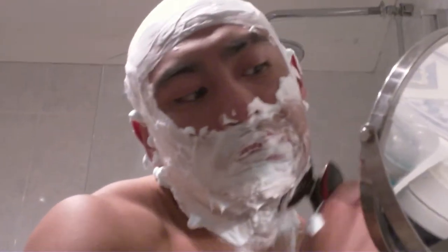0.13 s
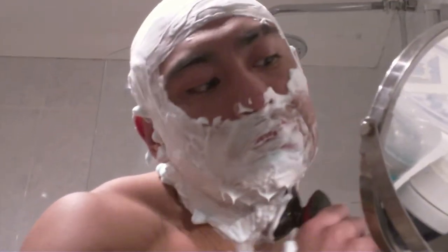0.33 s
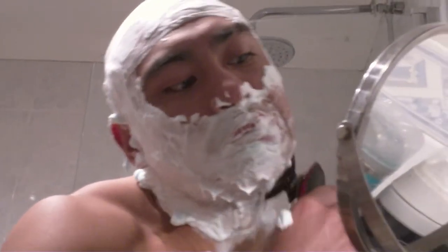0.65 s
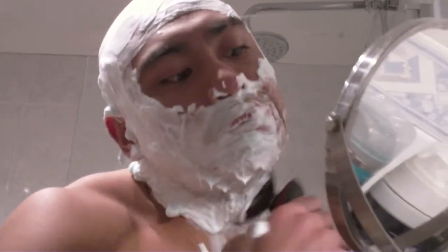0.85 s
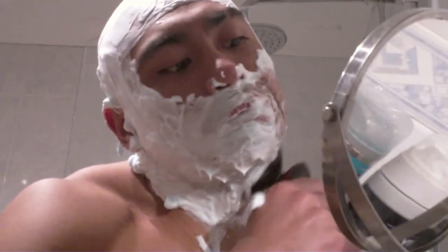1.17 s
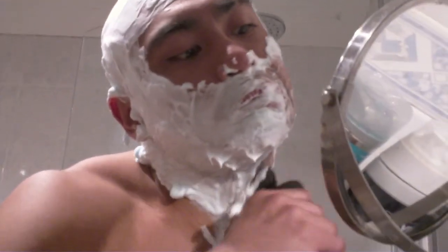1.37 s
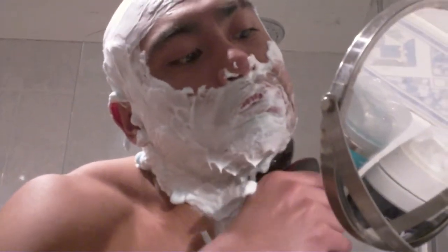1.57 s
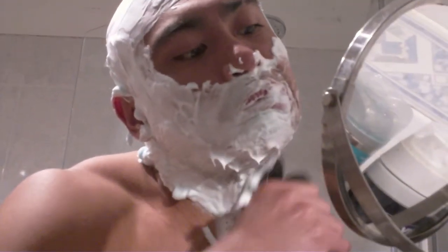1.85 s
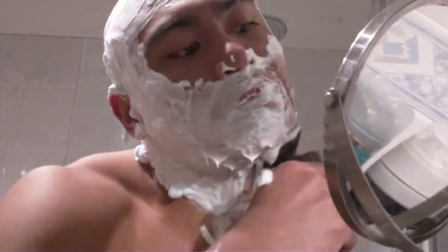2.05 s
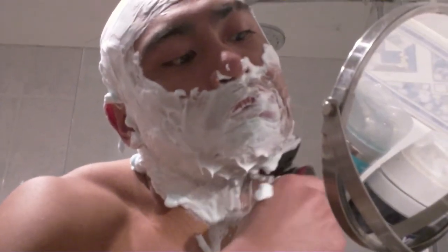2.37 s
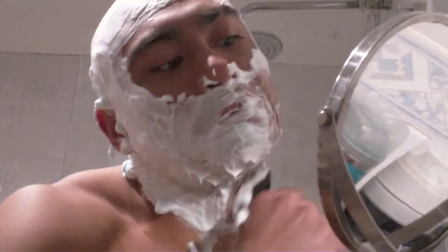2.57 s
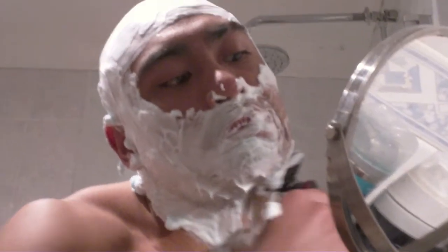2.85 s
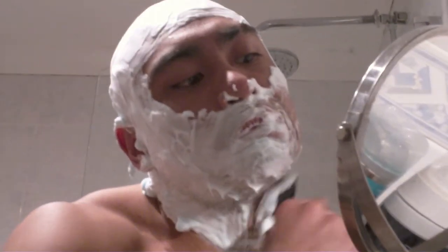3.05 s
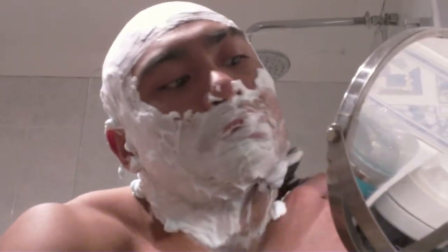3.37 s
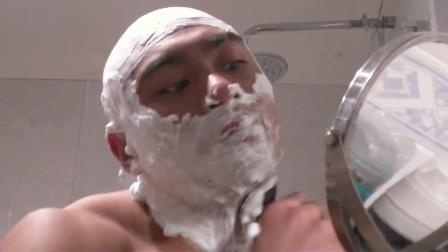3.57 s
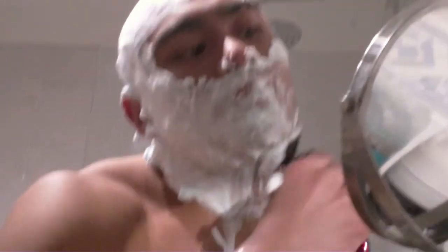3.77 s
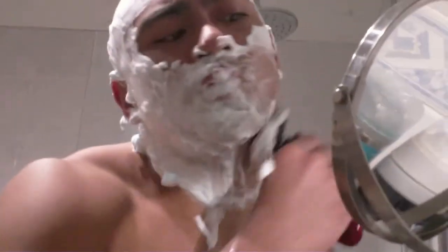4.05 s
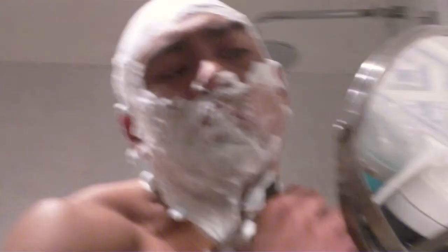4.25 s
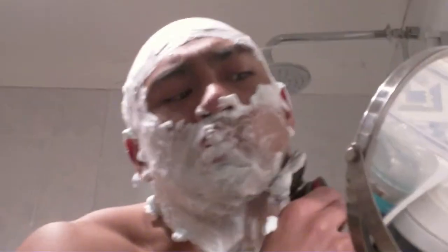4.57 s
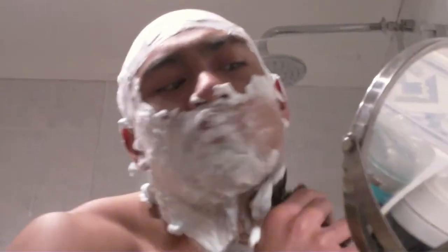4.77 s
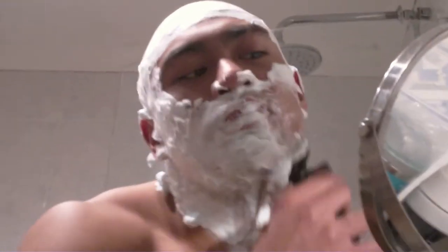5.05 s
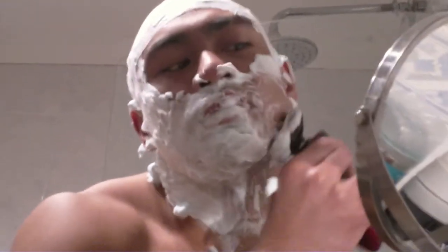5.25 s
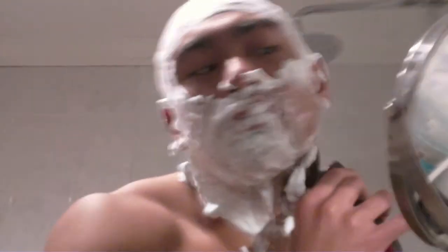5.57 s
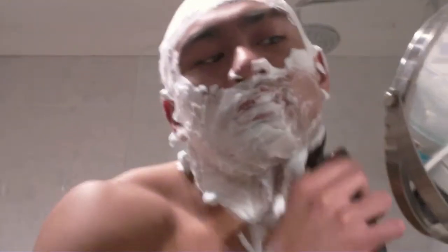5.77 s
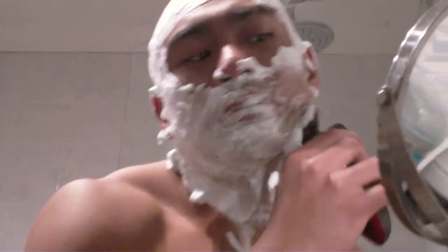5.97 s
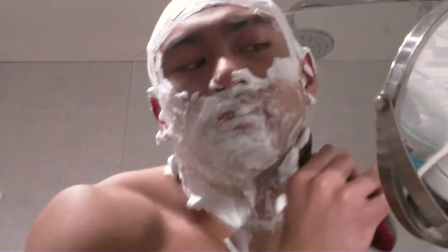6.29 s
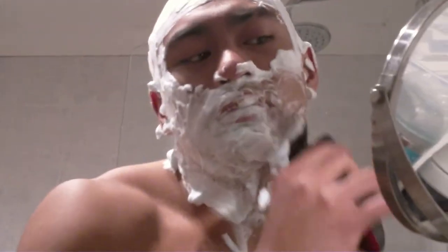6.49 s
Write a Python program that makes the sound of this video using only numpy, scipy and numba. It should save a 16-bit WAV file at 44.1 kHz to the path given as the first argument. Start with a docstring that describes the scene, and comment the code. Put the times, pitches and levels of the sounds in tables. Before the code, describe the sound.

A rotary electric shaver buzzes steadily close up over a foamy face and neck, with crackling foam and rasping stubble in a small bathroom.

```python
"""The buzz of a rotary electric shaver, close up, working over a foamy face and neck.
Motor and gears whine through the shell, the shell shakes once a turn and the cutters chatter in their
guards. Foam crackles, stubble rasps, single hairs snap and the thin steel heads sing out now and then.
The hand bumps softly twice. A small tiled bathroom adds a short echo; a fan rumbles behind it all."""
import sys
import numpy as np
from scipy import signal
from scipy.fft import rfft, irfft
from scipy.io import wavfile
from scipy.ndimage import uniform_filter1d
from numba import njit

SR = 44100
rng = np.random.default_rng(int(sys.argv[2]) if len(sys.argv) > 2 else 0)


def to_wav(s):
    """Save 16-bit WAV."""
    ch = np.atleast_2d(s).T  # columns
    pcm = np.round(np.clip(ch, -1, 1) * 32767)  # PCM
    wavfile.write(sys.argv[1], SR, pcm.astype(np.int16))


N = 292383

# Tone colour of the fan (frequency [Hz], relative level [dB])
FAN_SPECTRUM = [(26, -43), (45, -18.5), (64, -6.5), (108, -9), (145, -2), (219, -2), (255, -6), (324, -1.5),
                (447, -9), (544, -3.5), (631, -22), (700, -4.5), (910, -31), (1540, -120)]
# Fader ride on the fan (time [s], level [dB])
FAN_LEVEL = [(0.0, -37.5), (0.2, -45), (0.8, -47), (2.9, -45), (6.63, -45.5)]
# Knocks of the hand (time [s], level [dB], pitch [Hz])
HAND_BUMPS = [(3.927, -19, 171), (4.837, -23, 295)]
# Hairs snapping (time [s], peak before the low cut [dB], pitch [Hz])
HAIR_SNAPS = [(0.1087, -13.5, 6130), (0.2044, -18, 6460), (0.315, -18, 5800), (0.4504, -14, 5720),
              (2.368, -13, 5600), (2.597, -17, 5500), (3.469, -14, 6070), (3.904, -9.5, 6970),
              (3.9444, -21, 7240), (4.0704, -19, 7600), (4.091, -15, 8000), (4.163, -16, 7250),
              (4.1984, -11, 6030), (4.213, -8, 6070), (4.2275, -9, 8530), (4.2374, -18.5, 6900),
              (4.3211, -18, 7700), (4.6673, -12, 8350), (4.6793, -13, 8240), (4.739, -13, 6100),
              (4.8514, -8, 7000), (4.869, -3, 7300), (4.8888, -12, 7100), (5.1477, -9.5, 6950),
              (5.1692, -12, 7200), (5.5197, -6, 5730), (5.55, -7.5, 6550), (5.5935, -8, 7360),
              (5.6108, -8, 7200), (5.6406, -13, 6900), (6.3953, -11, 6700)]
# Steady bed of foam crackle (time [s], level [dB])
FOAM_LEVEL = [(0, -38), (.12, -33), (.6, -36.5), (.88, -36.5), (1.25, -35), (2.3, -34), (2.75, -32.5),
              (3.28, -36), (3.36, -31), (4.4, -31), (4.6, -33), (5.4, -30), (5.8, -31), (6.15, -42),
              (6.3, -32.5), (6.63, -35.5)]
# The heads run into stubble (start [s], length [s], level [dB], offset for sizzle and fizz [dB])
STUBBLE_RASPS = [(0.095, 0.28, -37.5, -17), (0.727, 0.067, -39, -6), (2.358, 0.11, -38, -6),
                 (2.906, 0.093, -36, -3), (3.326, 0.026, -34, 6), (3.444, 0.073, -27, 10),
                 (3.584, 0.023, -27, 2), (3.884, 0.097, -28, 11), (4.033, .07, -24, 9), (4.16, .08, -30, 8),
                 (4.314, 0.033, -28.5, 14), (4.666, 0.26, -24, 5.5), (5.11, 0.077, -26, -2),
                 (5.482, .2, -22.5, 6), (5.937, 0.026, -29, -4), (6.317, 0.14, -26, 6)]
# The steel heads sing out (start [s], length [s], level [dB])
HEAD_SQUEALS = [(1.2, 0.23, -39), (2.9, .05, -45), (3.33, 0.034, -43), (4.33, .1, -38),
                (4.85, 0.034, -20.5), (5.14, 0.029, -27), (5.31, 0.094, -29), (5.655, 0.021, -16.5),
                (5.94, 0.026, -32.5)]
# Resonances of the steel heads: ring, crackle, airy fizz, fine sizzle (centre [Hz], width [Hz], gain [dB])
HEAD_MODES = [(7150, 340, -1.3), (7470, 150, -1.3)]
CRACKLE_MODES = [(5780, 1140, 5.5), (7060, 2340, 5.5), (8010, 5800, -6)]
FIZZ_MODES = [(14550, 3100, 3), (13100, 1900, -7.5)]
SIZZLE_MODES = [(8740, 4500, 0)]
# Slight drift of the motor (time [s], speed [turns/s])
MOTOR_SPEED = [(0.0, 120.6), (0.25, 119.6), (1.0, 119.6), (1.25, 120.0), (2.75, 120.0), (3.25, 120.7),
               (3.5, 120.5), (3.75, 119.9), (4.0, 120.4), (4.5, 120.65), (5.0, 119.9), (5.5, 119.8),
               (6.25, 120.55), (6.63, 119.7)]
# Fader rides on the whine (time [s], low motor [dB], high motor [dB], gears [dB], top gears [dB])
WHINE_LEVELS = [(0, -48, -47, -42, -52.5), (.28, -40, -44, -44, -52), (.58, -43, -34.5, -47, -63.5),
                (1.0, -45, -52, -54, -59), (1.35, -44, -42, -47, -46), (1.65, -40, -46, -42, -46),
                (2.05, -35, -46, -38, -54), (2.45, -43, -40, -43, -44), (3.1, -39, -48, -52, -39),
                (3.4, -38, -35, -33, -51), (3.65, -41, -44, -43, -36.5), (4.0, -52, -49, -32.5, -51),
                (4.3, -33, -31, -43, -58), (4.62, -42, -48, -33, -55), (5.12, -39, -29.5, -49, -48),
                (5.55, -37, -46, -42, -44.5), (5.85, -36, -32.5, -42, -37), (6.15, -38, -38, -40.5, -42),
                (6.45, -37, -35, -35, -54), (6.63, -42, -34.5, -47, -57)]
# The rattle rises as the head presses into the skin
# (time [s], low shell [dB], upper shell [dB], mid and high guards [dB], low guard [dB])
RATTLE_LEVELS = [(0, -36, -39, -30, -37), (.25, -29, -30, -29, -38), (.5, -34.5, -37, -31, -40.5),
                 (1.15, -30.5, -35, -29.5, -34.5), (1.32, -36.5, -35, -30.5, -38),
                 (1.46, -33.5, -30.5, -29, -29), (1.78, -33, -29.5, -29, -29),
                 (1.95, -35.5, -36.5, -29, -40.5), (2.15, -35, -30, -27, -27.5),
                 (2.3, -35, -36.5, -32, -36), (2.56, -36, -37, -30, -39.5),
                 (2.85, -33.5, -32.5, -27.5, -33), (3.1, -36, -38.5, -29.5, -37),
                 (3.5, -33.5, -30.5, -27, -35), (4.15, -33, -32.5, -28, -37),
                 (4.55, -35.5, -34.5, -30, -37), (5.15, -33, -30.5, -27, -31),
                 (5.3, -36, -34.5, -29, -34.5), (5.75, -33, -32, -25, -31),
                 (6.11, -38.5, -40, -29.5, -36.5), (6.4, -34, -32, -27.5, -30), (6.63, -31, -32, -29, -34)]
# The head catches on the skin (start [s], length [s], added shake [dB], added chatter [dB])
SKIN_CATCHES = [(.55, .06, 1, -9), (0.748, .04, 1, -0.5), (0.932, 0.026, 2, -2), (1.378, 0.034, 1.5, 0),
                (2.345, 0.067, 3.5, 6), (2.864, .1, -2.5, 0), (3.22, .05, 0, -16), (3.764, 0.074, 4.5, -7),
                (4.314, 0.023, 3, -4), (4.926, 0.014, 7, 2), (5.801, 0.044, 4, -4), (6.382, .08, 0, -9)]
# Resonances of the shell, the body of the buzz (centre [Hz], width [Hz], gain [dB])
DEEP_SHELL = [(774, 360, -0.5), (953, 126, 4)]
LOW_SHELL = [(1155, 242, -1.5), (1246, 206, -3.5)]
UPPER_SHELL = [(1358, 178, 10), (1615, 270, 2.5)]
# Resonances of the cutter guards, the edge of the buzz (centre [Hz], width [Hz], gain [dB])
LOW_GUARD = [(1855, 175, -0.64), (2050, 168, -0.36)]
MID_GUARD = [(2365, 560, 0.3), (3110, 1340, -1)]
HIGH_GUARD = [(3540, 530, -1), (3715, 310, 1), (3975, 540, -5), (4814, 1870, -6)]
# Partials of the whine: pitches [multiples of motor speed] and their gains [dB]
LOW_ORDERS, LOW_GAINS_DB = (5, 6, 7, 8, 9, 10), (-28, -14.5, -15, -11.5, -9.5, -4)
HIGH_ORDERS, HIGH_GAINS_DB = (11, 12), (2, -24)
GEAR_ORDERS, GEAR_GAINS_DB = (10.42, 15.48, 16.15, 16.78, 20.85), (-4.5, -16, -19, -12.5, -1)
TOP_ORDERS, TOP_GAINS_DB = (28.3, 31.15), (-5.5, 0)

CUTTER_GEARING = .325  # cutter turns per motor turn


def undb(db):
    """Decibels to gain."""
    return 10 ** (np.asarray(db) / 20)


def rms(x):
    """Average signal strength."""
    return np.sqrt(np.mean(x ** 2))


def unit_rms(x):
    """Normalise to an rms of 1."""
    return x / rms(x)


def curves(table):
    """One fader curve per column, in straight lines between the time points."""
    times, *columns = np.transpose(table)
    return [np.interp(np.arange(N) / SR, times, column) for column in columns]


def swells(events, attack_s, release_s):
    """Summed power envelope of events that rise, hold and die away."""
    t = np.arange(N) / SR
    power = 0
    for start, hold, db in events:
        rise = np.clip((t - start) / attack_s, 0, 1)
        fall = np.exp(-np.clip(t - start - hold, 0, 9) / release_s)
        power += (undb(db) * rise * fall) ** 2
    return power


def wander(rate_hz):
    """Smooth random modulation with a spread near 1."""
    hold = int(SR / rate_hz)
    steps = np.repeat(rng.standard_normal(N // hold + 1), hold)
    return 1.3 * uniform_filter1d(uniform_filter1d(steps, hold), hold)[:N]


def throb(speed, depth):
    """Tremolo that swells once a turn."""
    turns = np.cumsum(speed) / SR
    return np.exp(depth * np.cos(2 * np.pi * turns))


def grains(per_s, spread_db):
    """Random clicks, most small and a few larger."""
    hits = rng.random(N) < per_s / SR
    sizes = undb(spread_db * np.minimum(rng.exponential(1, N), 3))
    return unit_rms(hits * sizes * np.tanh(rng.standard_normal(N)))


@njit
def bandpass(x, hz, width_hz):
    """State-variable band-pass with gain 1 at the centre."""
    y, band_state, low_state = np.empty(len(x)), 0., 0.
    g, damping = np.tan(np.pi * hz / SR), width_hz / hz
    for i in range(len(x)):
        band = (band_state + g * (x[i] - low_state)) / (1 + g * (g + damping))
        band_state = 2 * band - band_state
        low_state += 2 * g * band
        y[i] = damping * band
    return y


@njit
def repeat_turns(x, speed, feedback):
    """Comb filter: each turn replays a share of the turn before."""
    y = x.copy()
    for i in range(len(x)):
        turn_ago = i - int(SR / speed[i])
        if turn_ago >= 0:
            y[i] += feedback * y[turn_ago]
    return y


def ring(x, modes, sway_db, sway_hz):
    """Steep resonances whose strength sways as grip and angle change; comes out at an rms of 1."""
    out = 0
    for k, (hz, width, db) in enumerate(modes):
        resonance = bandpass(bandpass(x, hz, width), hz, width)
        out += (-1) ** k * undb(db + sway_db * wander(sway_hz)) * resonance
    return unit_rms(out)


def tones(turns, orders, gains_db, sway_db, slip_cycles):
    """Sines locked to the motor, each wavering in level and phase."""
    out = 0
    for order, db in zip(orders, gains_db):
        amplitude = np.sqrt(2) * undb(db + sway_db * wander(9))
        out += amplitude * np.sin(2 * np.pi * (order * turns + slip_cycles * wander(12)))
    return out


def fan():
    """The extractor fan lays a low bed of rumbling noise."""
    hz, db = np.transpose(FAN_SPECTRUM)
    bins_hz = np.arange(N // 2 + 1) * SR / N + 1
    colour = undb(np.interp(np.log(bins_hz), np.log(hz), db))
    rumble = irfft(rfft(rng.standard_normal(N)) * colour, N)
    return undb(curves(FAN_LEVEL)[0]) * unit_rms(rumble)


def tile_echo(x, t60_s=.17, wet_db=-9.5, predelay_s=.003):
    """The tiled walls throw back a short, dense echo."""
    t = np.arange(SR // 2) / SR
    tail = rng.standard_normal(len(t)) * np.exp(-np.log(1000) * t / t60_s) * (t > predelay_s)
    return undb(wet_db) * signal.fftconvolve(x, tail / np.sqrt(np.sum(tail ** 2)))[:N]


def hand_bumps(edge_hz=600):
    """The hand knocks softly: a low thud with a brief higher edge."""
    t, out = np.arange(N) / SR, 0
    for start, db, hz in HAND_BUMPS:
        age = np.clip(t - start, 0, 1)
        thud = np.sin(2 * np.pi * hz * age) * (1 - np.exp(-age / .003)) * np.exp(-age / .0049)
        edge = .5 * np.sin(2 * np.pi * edge_hz * age) * np.exp(-age / .0042)
        out += undb(db) * (thud + edge)
    return out


def hair_snaps(hiss_db=-11.5, low_cut_hz=4500):
    """Single hairs snap: a short gritty ping with a bright hiss."""
    out, t = np.zeros(N + SR), np.arange(SR // 20) / SR
    envelope = (1 - np.exp(-t / .00017)) * np.exp(-t / .005)
    for start, db, hz in HAIR_SNAPS:
        grit, air = rng.standard_normal((2, len(t)))
        ping = np.sin(2 * np.pi * hz * t) * (1 + 2.5 * uniform_filter1d(grit, size=20))
        hiss = undb(hiss_db) * np.diff(air, prepend=0) * np.exp(-t / .006)
        snap = envelope * (ping + hiss)
        out[int(start * SR):][:len(t)] += undb(db) * snap / np.max(np.abs(snap))
    return signal.sosfilt(signal.butter(3, low_cut_hz, "high", fs=SR, output="sos"), out[:N])


def steel_heads(cutting_gain, follow_db=-14):
    """The thin steel heads ring along with the cutting and sing out in brief squeals."""
    squeals = np.sqrt(swells(HEAD_SQUEALS, attack_s=.0062, release_s=.036))
    steel = ring(rng.standard_normal(N), HEAD_MODES, sway_db=.62, sway_hz=22)
    return (squeals + undb(follow_db) * cutting_gain) * steel


def foam_and_stubble(speed, sizzle_db=-16, fizz_db=-12):
    """Foam crackles at the slots, stubble rasps in gritty bursts, and both ring the steel heads."""
    foam = undb(curves(FOAM_LEVEL)[0])
    start, hold, rasp_db, offset_db = np.transpose(STUBBLE_RASPS)
    rasp, bright_rasp = (np.sqrt(swells(zip(start, hold, db), attack_s=.014, release_s=.011))
                         for db in (rasp_db, rasp_db + offset_db))
    # each caught hair scrapes for about two milliseconds
    scrapes = unit_rms(uniform_filter1d(np.abs(grains(per_s=140, spread_db=3.5)), size=90))
    pulse = throb(CUTTER_GEARING * speed, depth=.07)
    body_gain, top_gain = (pulse * (foam * (1 + .15 * scrapes) + stubble * (.32 + .36 * scrapes))
                           for stubble in (rasp, bright_rasp))
    grit = rng.standard_normal(N) + .5 * grains(per_s=1000, spread_db=1.1)
    froth = grit + .52 * grains(per_s=220, spread_db=3.5)  # foam bubbles pop on top
    heads = steel_heads(foam + rasp)
    crackle = rms(body_gain) * ring(body_gain * grit, CRACKLE_MODES, sway_db=1.98, sway_hz=25)
    sizzle = rms(top_gain) * ring(top_gain * froth, SIZZLE_MODES, sway_db=1.7, sway_hz=23)
    fizz = rms(top_gain) * ring(top_gain * froth, FIZZ_MODES, sway_db=1.8, sway_hz=25)
    return crackle + heads + undb(sizzle_db) * sizzle + undb(fizz_db) * fizz


def motor_whine(speed):
    """Motor and gear tones pass through the shell; the gear teeth run rougher."""
    low, high, gears, top = undb(curves(WHINE_LEVELS))
    turns = np.cumsum(speed) / SR
    return (low * tones(turns, LOW_ORDERS, LOW_GAINS_DB, sway_db=1.5, slip_cycles=.03)
            + high * tones(turns, HIGH_ORDERS, HIGH_GAINS_DB, sway_db=1.5, slip_cycles=.03)
            + gears * tones(turns, GEAR_ORDERS, GEAR_GAINS_DB, sway_db=2, slip_cycles=.09)
            + top * tones(turns, TOP_ORDERS, TOP_GAINS_DB, sway_db=3, slip_cycles=.8))


def shell_and_cutters(speed, flutter_db=.74):
    """The shell shakes once a motor turn; the cutters chatter in their guards, alike from turn to turn."""
    low_db, upper_db, guard_db, low_guard_db = curves(RATTLE_LEVELS)
    cutter_speed = CUTTER_GEARING * speed
    shake = throb(speed, depth=.23) * rng.standard_normal(N)
    grit = rng.standard_normal(N) + .5 * grains(per_s=1500, spread_db=2.2)
    chatter = throb(cutter_speed, depth=.1) * grit
    # the rattle jumps where the head catches on the skin
    start, hold, *added_db = np.transpose(SKIN_CATCHES)
    jolt, scrape = (np.sqrt(1 + swells(zip(start, hold, db), attack_s=.013, release_s=.014))
                    for db in added_db)
    shake = jolt * repeat_turns(shake, speed, feedback=.28)
    chatter = scrape * repeat_turns(chatter, cutter_speed, feedback=.22)
    layers = [(low_db - 5.5, shake, DEEP_SHELL), (low_db, shake, LOW_SHELL),
              (upper_db, shake, UPPER_SHELL), (low_guard_db, chatter, LOW_GUARD),
              (guard_db - 1.5, chatter, MID_GUARD), (guard_db, chatter, HIGH_GUARD)]
    flutter = undb(flutter_db * wander(24))
    return flutter * sum(undb(db) * ring(drive, modes, sway_db=.9, sway_hz=16)
                         for db, drive, modes in layers)


def scene():
    """Mono mix: the shaver up front, its echo, the fan and two soft bumps of the hand."""
    speed, = curves(MOTOR_SPEED)
    shaver = motor_whine(speed) + shell_and_cutters(speed) + foam_and_stubble(speed) + hair_snaps()
    return (shaver + tile_echo(shaver) + fan() + hand_bumps())[None]


def record(dry, notch_hz=11230, width_hz=500, leak=.04, rolloff_hz=15280, cutoff_hz=15800):
    """The microphone port carves a deep notch in the treble; the top end is cut in two steps."""
    b, a = signal.iirnotch(notch_hz, notch_hz / width_hz, fs=SR)
    notched = signal.lfilter(b, a, signal.lfilter(b, a, dry))
    out = (1 - leak) * notched + leak * dry
    out = signal.sosfilt(signal.ellip(8, .3, 27, rolloff_hz, fs=SR, output="sos"), out)
    return signal.sosfilt(signal.ellip(12, .3, 80, cutoff_hz, fs=SR, output="sos"), out)


dry = scene()
out = record(dry)
to_wav(out)
```